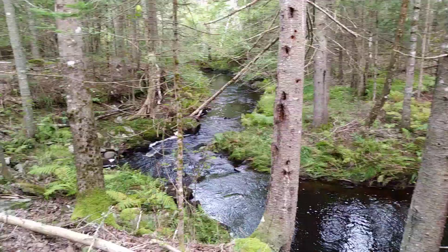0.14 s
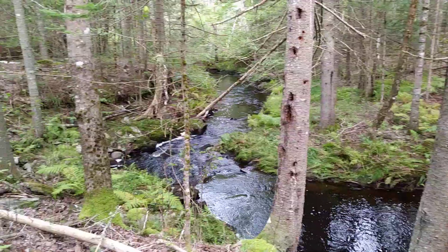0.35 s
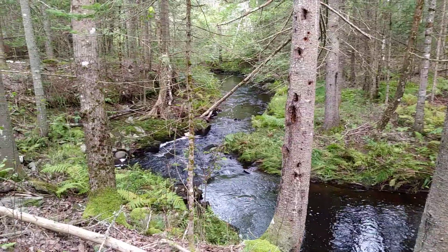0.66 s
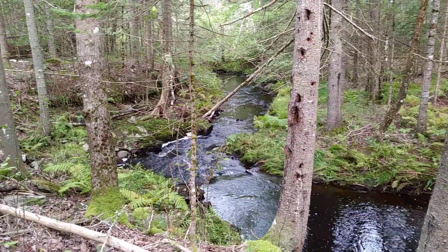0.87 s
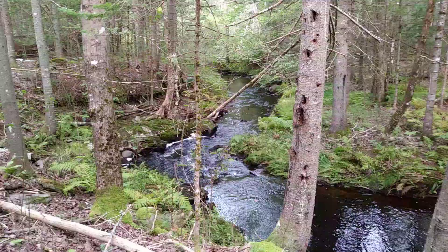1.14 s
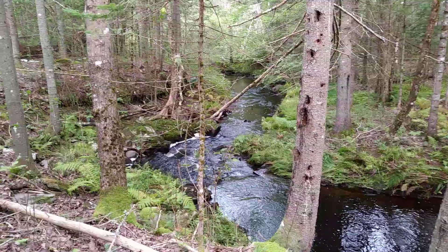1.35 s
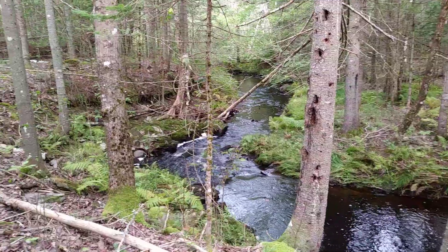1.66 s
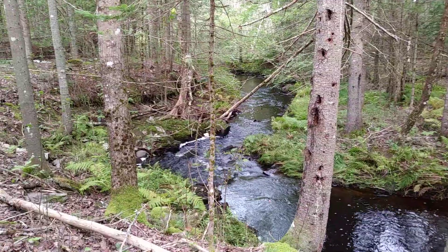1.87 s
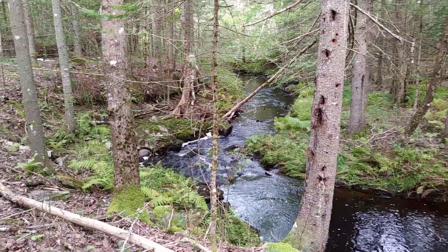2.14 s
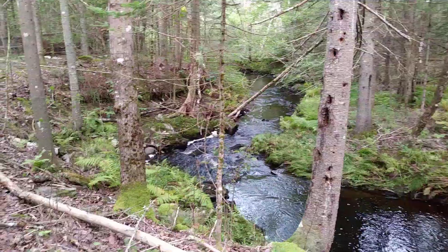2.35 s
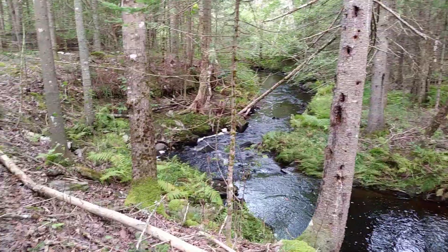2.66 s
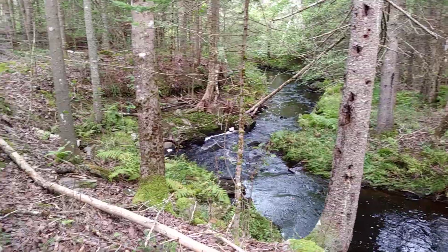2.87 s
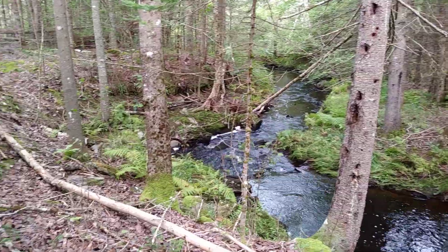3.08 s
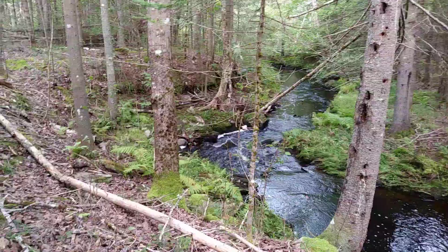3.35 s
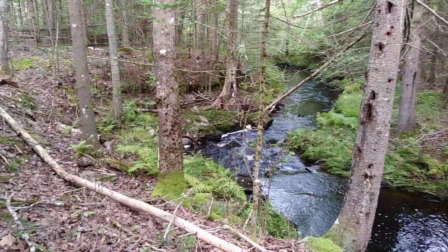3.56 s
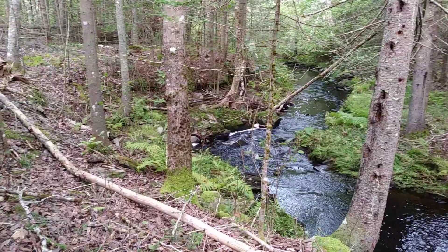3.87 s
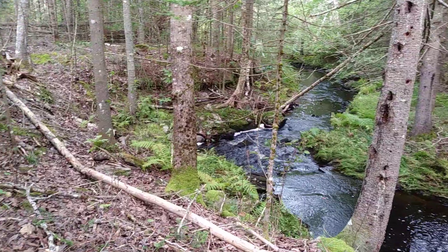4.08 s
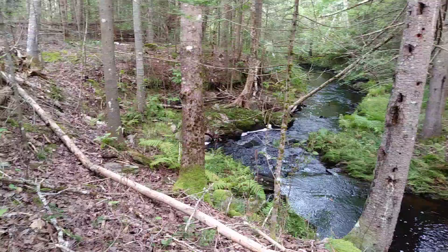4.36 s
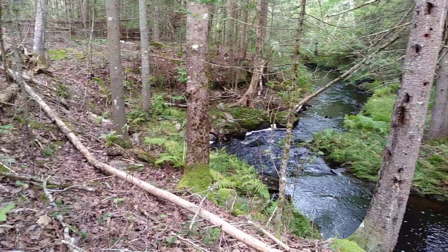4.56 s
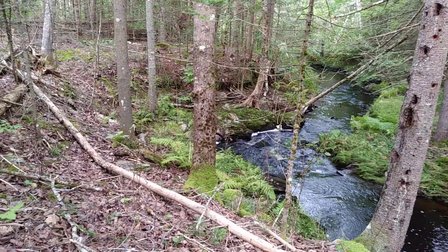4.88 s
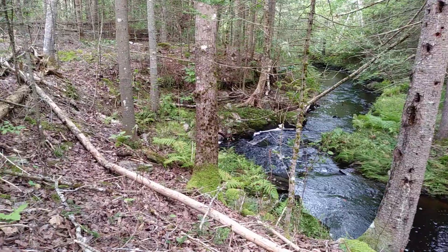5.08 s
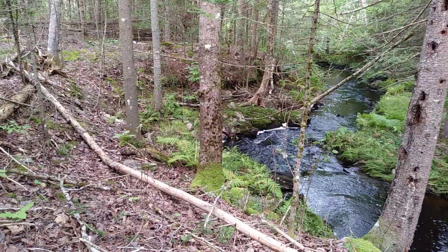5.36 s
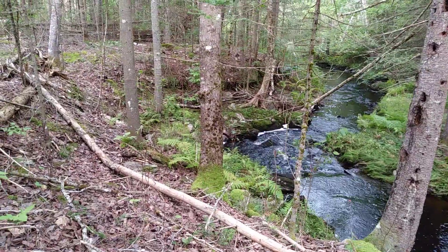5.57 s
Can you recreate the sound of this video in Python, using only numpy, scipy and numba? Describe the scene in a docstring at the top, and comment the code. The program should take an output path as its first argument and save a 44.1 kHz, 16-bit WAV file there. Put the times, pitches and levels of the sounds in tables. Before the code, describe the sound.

A woodland brook pours over rocks some metres away, a steady bright rush made of countless small bubbles. Hollow gurgles swell and fade beneath it, and single plips and droplets tick out. Dull, very short knocks from the camera body come near 0.6, 1.7, 5.1 and 5.6 seconds. Narrow mono sound from a small camera, little bass or top, faint hiss.

```python
"""A bright rush of water comes first: a brook over stones, some metres from a small camera's narrow microphone.
The rush sums thousands of ringing, fading bubbles with noise; single blips and droplets tick out of it.
Large, slow bubbles gurgle below, the deepest in spells, and a surface close by returns an inverted echo.
Four dull knocks, as from the camera's housing, ring a set of short modes; the electronics add faint shaped noise."""
import sys
import numpy as np
from scipy import signal
from scipy.fft import rfft, irfft
from scipy.io import wavfile
from scipy.ndimage import uniform_filter1d
from numba import njit

SR = 44100
rng = np.random.default_rng(int(sys.argv[2]) if len(sys.argv) > 2 else 0)


def pcm_store(signal):
    """Save signal as 16-bit PCM."""
    levels = np.round(np.clip(np.atleast_2d(signal), -1, 1) * 32767)
    wavfile.write(sys.argv[1], SR, levels.astype(np.int16).T)


N = 252252  # length in samples


def undb(db):
    """Gain of a level in dB."""
    return 10 ** (np.asarray(db) / 20)


def level(x, db):
    """Scale to an rms level in dB re full scale."""
    return x * undb(db) / np.sqrt(np.mean(x ** 2))


def colour(x, points):
    """Filter by a curve of (Hz, dB) points, straight over log frequency and flat beyond its ends."""
    hz, db = np.transpose(points)
    f = np.maximum(np.arange(N // 2 + 1) * SR / N, 1)
    gain = undb(np.interp(np.log(f), np.log(hz), db))
    return irfft(rfft(x) * gain, N)


def follow(points_s, points_db):
    """Gain over time, gliding in dB between the given points."""
    return undb(np.interp(np.arange(N) / SR, points_s, points_db))


def highpass(x, order, hz):
    """Remove what lies below hz."""
    return signal.sosfilt(signal.butter(order, hz, "highpass", fs=SR, output="sos"), x)


@njit
def ring(start_s, hz, size, fade_s, rise_s, glide):
    """Tones that swell in rise_s, fall 6 dB per fade_s and climb by the share glide meanwhile."""
    out = np.zeros(N)
    for k in range(len(start_s)):
        first = int(start_s[k] * SR)
        step = 2 * np.pi * hz[k] / SR
        phase = 0.
        # the envelope is a slow decay minus a faster one, so it opens from zero
        tail, gap = size[k], size[k]
        samples = fade_s[k] * SR
        fall = .5 ** (1 / samples)
        swell = np.exp(-1 / (rise_s[k] * SR))
        climb = 1 + glide / samples
        for i in range(max(first, 0), min(first + int(8 * samples), N)):
            phase += step
            step = min(step * climb, 3.)  # stay below half the sample rate
            tail *= fall
            gap *= fall * swell
            out[i] += (tail - gap) * np.sin(phase)
    return out


def swarm(count, low_hz, high_hz, cycles, rise, spread_db, glide, splashes, splash_s, splash_db, span=1):
    """Bubbles even in log pitch, a few louder than the rest, born in splashes that differ in strength.

    A splash covers the share span of the pitch range; cycles and rise count periods of each bubble."""
    pitch, life, luck, member, lag = rng.random((count, 5)).T
    when, strength, lowest = rng.random((splashes, 3)).T
    own = (member * splashes).astype(int)  # the splash each bubble belongs to
    place = (lowest[own] + span * pitch) % 1
    hz = low_hz * (high_hz / low_hz) ** place
    bubble_db = -spread_db * np.log(1 - .98 * luck)
    own_splash_db = -splash_db * np.log(1 - .98 * strength[own])
    start_s = when[own] * N / SR - splash_s * np.log(1 - lag)
    fade_s = cycles * (.5 + life) / hz
    bubbles = ring(start_s, hz, undb(bubble_db + own_splash_db), fade_s, rise / hz, glide)
    # even out the long-term spectrum, so that the later colour sets it
    spectrum = rfft(bubbles)
    trend = uniform_filter1d(np.abs(spectrum) ** 2, size=1500)
    return irfft(spectrum / np.sqrt(trend), N)


# Tint of the electronic noise: pitch_hz [Hz], density_db [dB per Hz, relative]
HISS_TINT = [(20, 6), (200, 6), (1000, -2.5), (7000, 3.5), (13000, 3)]
HISS_DB = -84  # rms, before the top is cut


def hiss():
    """Steady random noise of the electronics, shaped in colour."""
    return level(colour(rng.standard_normal(N), HISS_TINT), HISS_DB)


# Blows: start_s [s], peak_db [dB before the microphone], hardness_db [dB per octave]
BLOWS = [(0.6286, -25, -2), (1.698, -22, 3), (5.079, -18, 7), (5.5923, -27, -4.5)]
# Modes of the housing: pitch_hz [Hz], level_db [dB, relative], t60_s [s to fall 60 dB]; pitch and level then vary
HOUSING_MODES = [(522, -8.5, 0.027), (775, 1, 0.02), (1133, 12, 0.008), (1360, 0, 0.012),
                 (1930, -9, 0.0083), (2740, -21, 0.0038), (3880, -28, 0.011)]


def knocks():
    """Each blow sets off all the modes, neighbours in opposite directions; a harder blow favours the high ones."""
    hz, mode_db, t60_s = np.array(HOUSING_MODES, float).T
    sign = -(-1.) ** np.arange(len(hz))
    octaves = np.log2(hz / hz[0])
    chances = rng.standard_normal((len(BLOWS), len(hz)))
    out = 0
    for (start_s, peak_db, hardness_db), chance in zip(BLOWS, chances):
        size = sign * undb(mode_db + hardness_db * octaves + 2.0 * chance)
        varied_hz = hz * (1 + 0.019 * chance[::-1])
        blow = ring(start_s + 0 * hz, varied_hz, size, t60_s / 10, 0.0003 + 0 * hz, 0.)
        blow = highpass(blow, 3, 400)
        out = out + undb(peak_db) * blow / np.abs(blow).max()
    return out


# Tint of the deepest gurgle: pitch_hz [Hz], density_db [dB per Hz, relative]
DEEP_TINT = [(150, -42.5), (230, -22.5), (330, 5), (400, 8), (470, -1), (600, -28)]
# Tint of the smaller gurgling bubbles: pitch_hz [Hz], density_db [dB per Hz, relative]
BUBBLING_TINT = [(350, -52.5), (460, -16.5), (540, 0), (640, 7), (760, -9), (950, -43.5)]
# Spells of deep gurgling: full_s [s, when the rise is complete], hold_s [s], level_db [dB before echo and microphone]
DEEP_SPELLS = [(0.062, 0.067, -74.5), (0.233, 0.19, -89), (0.625, 0.11, -74), (0.834, 0.051, -81),
               (1.058, 0.09, -74.5), (1.193, 0.2, -84), (1.577, 0.024, -82), (1.69, 0.087, -73.5),
               (2.653, 0.049, -81.5), (2.926, 0.14, -82), (3.358, 0.11, -79.5), (3.67, 0.16, -81.5),
               (4.225, 0.019, -81), (4.493, 0.14, -85), (5.086, 0.22, -79.5), (5.588, 0.13, -75)]
# Ride of the smaller gurgling bubbles: time_s [s], level_db [dB before echo and microphone]
BUBBLING_RIDE = [(0, -66), (0.12, -64), (0.36, -61), (0.5, -78), (0.66, -60), (0.8, -68), (1.07, -89),
                 (1.23, -62), (1.4, -68), (1.56, -78), (1.74, -67), (1.88, -58.5), (2.02, -79), (2.28, -73),
                 (2.38, -67), (2.68, -72), (2.97, -65.5), (3.1, -94), (3.3, -63), (3.55, -65.5), (3.8, -58),
                 (3.95, -76), (4.42, -83), (4.52, -71.5), (4.68, -63), (4.83, -86), (4.93, -68),
                 (5.14, -67), (5.32, -88), (5.48, -66), (5.62, -62.5), (5.72, -65)]
SPELL_ATTACK_S, SPELL_RELEASE_S = 0.014, 0.03  # length of the straight rise, time constant of the release
CALM_DEEP_DB = -98


def gurgle():
    """Large, slow bubbles under the stones; each deep spell rises quickly out of the calm, holds and dies away."""
    full_s, hold_s, spell_db = np.array(DEEP_SPELLS, float).T[:, :, None]
    age = np.arange(N) / SR - full_s
    attack = np.clip(age / SPELL_ATTACK_S + 1, 0, 1)
    release = np.exp(-np.maximum(age - hold_s, 0) / SPELL_RELEASE_S)
    deep_gain = undb(CALM_DEEP_DB) + (undb(spell_db) * attack * release).sum(axis=0)
    small_gain = follow(*np.transpose(BUBBLING_RIDE))
    big = swarm(count=2500, low_hz=208.6, high_hz=784.5, cycles=4.5, rise=0.37, spread_db=3.5, glide=0.03,
                splash_s=0.017, splash_db=1.7, splashes=500)
    deep = deep_gain * level(colour(big, DEEP_TINT), 0)
    small = small_gain * level(colour(big, BUBBLING_TINT), 0)
    return deep + small


SCATTER_DB, SCATTER_FADE_S = -8.5, 0.0095  # energy of the tail re the direct sound, time constant


def scatter(x):
    """Stones and banks return each sound as a short, rough tail: decaying noise."""
    age = np.arange(SR // 20) / SR
    tail = rng.standard_normal(len(age)) * np.exp(-age / SCATTER_FADE_S)
    tail = level(tail, SCATTER_DB) / np.sqrt(len(age))
    return x + signal.fftconvolve(x, tail)[:N]


# Bubbles that stand out: peak_s [s, about], pitch_hz [Hz at birth],
# peak_db [dB before scatter, filter and microphone], ring_cycles [periods to fall 12 dB]
BUBBLE_BLIPS = [(0.075, 312, -76, 7), (0.205, 874, -38.5, 10), (0.211, 4430, -42.5, 14),
                (0.247, 382, -63, 10), (0.509, 1520, -36.5, 3.8), (0.66, 2230, -32.5, 4.5),
                (0.667, 497, -52.5, 9.7), (0.826, 990, -40.5, 4.1), (1.033, 886, -40, 10.6),
                (1.203, 980, -39.5, 7), (1.151, 953, -38.5, 7.3), (1.174, 1170, -38, 5),
                (1.279, 910, -40, 31), (1.333, 1660, -36.5, 6.4), (1.39, 1600, -37.5, 4.9),
                (1.439, 1250, -30, 4.4), (1.543, 863, -37, 6.2), (1.874, 523, -54.5, 9.2),
                (1.893, 1250, -45, 7), (1.925, 1620, -37, 4.8), (2.01, 920, -40, 15.4),
                (2.024, 2260, -38.5, 5), (2.307, 910, -39.5, 4.3), (2.189, 703, -43.5, 6.3),
                (2.313, 1170, -42, 6), (2.139, 1086, -29.5, 2.7), (2.301, 4420, -40.5, 8.9),
                (2.443, 2160, -39.5, 19), (2.546, 940, -39, 7.5), (2.548, 1380, -39, 4.5),
                (2.694, 1190, -35.5, 5.6), (2.964, 375, -58, 12), (2.918, 1400, -37, 4.1),
                (2.977, 960, -37, 10.6), (3.229, 1520, -38, 8.4), (3.29, 2130, -40, 9.6),
                (3.336, 2165, -43, 39), (3.371, 1720, -39.5, 5.1), (3.404, 2260, -35.5, 2.8),
                (3.644, 1770, -34, 1.9), (3.488, 1210, -43, 5.3), (3.765, 717, -40.5, 8.5),
                (3.772, 422, -65, 9.7), (3.829, 1970, -30, 2.7), (3.903, 1700, -30.5, 4.3),
                (3.953, 853, -41, 8), (4.234, 1610, -37.5, 12), (4.349, 1550, -34, 5.5),
                (4.458, 906, -35.5, 8), (4.51, 466, -67, 7.4), (4.549, 414, -62, 9.1), (4.597, 239, -76, 4),
                (4.698, 750, -44, 9.4), (4.698, 1040, -37, 9.8), (4.888, 1068, -38, 10),
                (5.162, 417, -56, 2.6), (5.206, 950, -38, 3.9), (5.233, 1454, -32, 6.2),
                (5.234, 420, -64, 5.4), (5.286, 422, -65, 4.2), (5.315, 880, -46, 14),
                (5.404, 2160, -41.5, 14), (5.46, 1510, -31.5, 3.1), (5.46, 4530, -45, 16),
                (5.504, 810, -38.5, 3.5), (5.513, 4900, -46.5, 9.1), (5.645, 1490, -33.5, 4.5)]
# Droplets that tick in the spray: peak_s [s, about], pitch_hz [Hz at birth],
# peak_db [dB before scatter, filter and microphone]
DROPLETS = [(0.199, 2870, -41.5), (0.76, 4600, -50), (0.821, 3700, -44), (0.83, 2210, -40.5),
            (1.283, 3600, -48), (1.311, 3540, -45), (1.882, 3460, -49), (2.026, 3720, -43),
            (2.099, 4750, -51), (2.133, 2550, -47), (2.268, 3020, -46), (2.301, 2770, -41),
            (2.347, 5030, -57), (2.364, 2950, -43), (2.929, 4940, -50), (3.219, 2800, -48),
            (3.227, 3830, -46), (3.228, 4430, -48), (3.279, 3220, -47), (3.319, 4630, -49.5),
            (3.348, 3600, -47), (3.355, 2430, -41), (3.39, 4300, -45), (3.391, 4900, -56),
            (3.759, 3700, -45), (3.873, 4400, -45.5), (4.265, 3080, -44), (4.433, 4860, -51),
            (4.692, 2800, -45), (5.232, 3040, -46)]
DROP_CYCLES = 7  # every droplet's periods to fall 12 dB
DEEP_HZ = 600  # bubbles from here up lose their bass


def blips():
    """Single bubbles and droplets: each swells fast, then rings and climbs a little; small ones carry no bass."""
    drops = [(*drop, DROP_CYCLES) for drop in DROPLETS]
    peak_s, hz, peak_db, ring_cycles = np.array(BUBBLE_BLIPS + drops, float).T
    fade_s, rise_s = 0.5 * ring_cycles / hz, 1.07 / hz
    # height that the swelling, fading envelope reaches, to be scaled to the peak level
    ratio = rise_s * np.log(2) / fade_s
    height = (ratio / (1 + ratio)) ** ratio / (1 + ratio)
    size = undb(peak_db) / height
    start_s = peak_s - 1.015 / hz
    deep = ring(start_s, hz, (hz < DEEP_HZ) * size, fade_s, rise_s, 0.019)
    small = ring(start_s, hz, (hz >= DEEP_HZ) * size, fade_s, rise_s, 0.019)
    return scatter(deep) + highpass(scatter(small), 6, DEEP_HZ)


# Tint of the rush: pitch_hz [Hz], density_db [dB per Hz, relative]
RUSH_TINT = [(500, -56.5), (630, -16), (720, -5), (880, 1.5), (1300, -2), (1700, -0.5), (2000, -5.5),
             (2500, -8), (3000, -30), (4000, -60)]
# Tint of the fine spray: pitch_hz [Hz], density_db [dB per Hz, relative]
SPRAY_TINT = [(1800, -26.5), (2500, -5.5), (3000, 2), (3600, -0.5), (4400, -1.5), (4700, -1.5),
              (5200, -8.5), (5550, -14.5), (5900, -24), (7000, -51)]
# Ride of the water: time_s [s], rush_db and spray_db [dB before echo and microphone]
FLOW_RIDE = [(0.0, -47.5, -59.5), (0.25, -48, -60), (1.15, -47.5, -60), (2.241, -48, -58.5),
             (2.58, -48.5, -60.5), (3.62, -47, -59), (3.97, -48, -59.5), (4.84, -48, -59.5),
             (5.72, -47.5, -59)]


def rush():
    """Splashes near enough to tell apart, sharp spatter and longer plips, over the blur of those up and down stream."""
    time_s, rush_db, spray_db = np.transpose(FLOW_RIDE)
    water = dict(low_hz=453.0, high_hz=6396.0, rise=0.66, glide=0.0318, span=0.4)
    near = swarm(count=14000, cycles=3.76, spread_db=1.0, splash_s=.008, splash_db=0.0, splashes=500, **water)
    plips = swarm(count=2200, cycles=8.97, spread_db=2.5, splash_s=.025, splash_db=2.5, splashes=250, **water)
    spatter = swarm(count=3000, cycles=1.42, spread_db=6.0, splash_s=.0015, splash_db=1.5, splashes=300, **water)
    fine = level(near, -7.0) + level(spatter, -15)
    blur = rng.standard_normal(N)
    body = fine + level(blur, -6.5) + level(plips, -8.0)
    mist = fine + level(blur, -4.5) + level(plips, -12.0)
    body = follow(time_s, rush_db) * level(colour(body, RUSH_TINT), 0)
    spray = follow(time_s, spray_db) * level(colour(mist, SPRAY_TINT), 0)
    return body + spray


# Strength of the echo, which returns the treble best: pitch_hz [Hz], level_db [dB re the direct sound]
ECHO_TINT = [(1200, -41.5), (3500, -11), (5500, -21.5)]
ECHO_S = 0.00144


def add_echo(stream):
    """A surface close by returns the water late and inverted, which combs its spectrum."""
    late = np.roll(stream, round(ECHO_S * SR))  # the end wraps to the start
    return stream - colour(late, ECHO_TINT)


def scene():
    """The brook with its echo, the blips and the knocks, in one channel."""
    stream = add_echo(rush() + gurgle())
    return (stream + blips() + knocks())[None]


TOP_HZ = 12900


def record(dry):
    """The microphone passes only the middle of the range; hiss joins after it and the top is cut."""
    band = signal.butter(4, [240, 5900], "bandpass", fs=SR, output="sos")
    band = np.vstack([band, signal.butter(6, 6500, fs=SR, output="sos")])
    top = signal.ellip(10, .2, 60, TOP_HZ, fs=SR, output="sos")
    # the brook was already flowing: a mirrored lead-in settles the filter, then is dropped
    lead = SR // 10
    led_in = np.pad(dry, ((0, 0), (lead, 0)), mode="reflect")
    heard = signal.sosfilt(band, led_in)[:, lead:]
    return signal.sosfilt(top, heard + hiss())


dry = scene()
out = record(dry)
pcm_store(out)
```